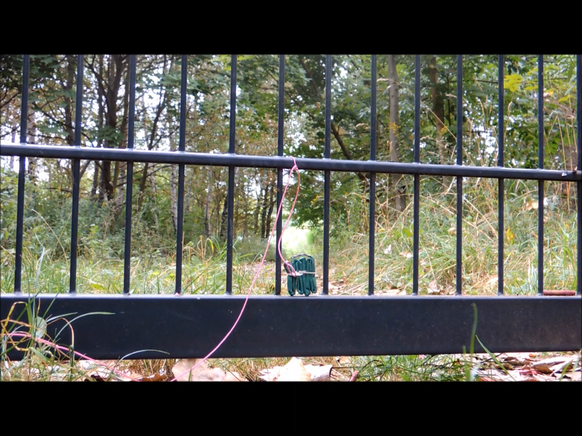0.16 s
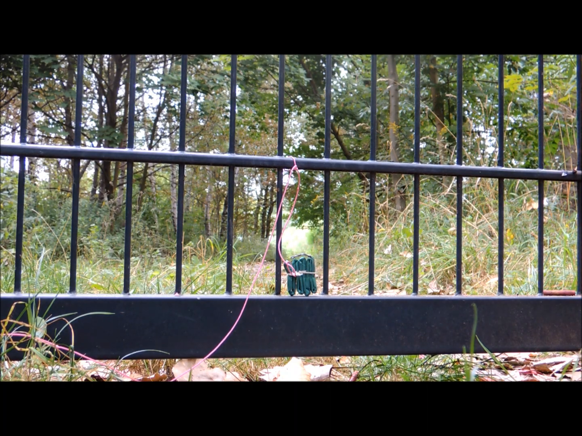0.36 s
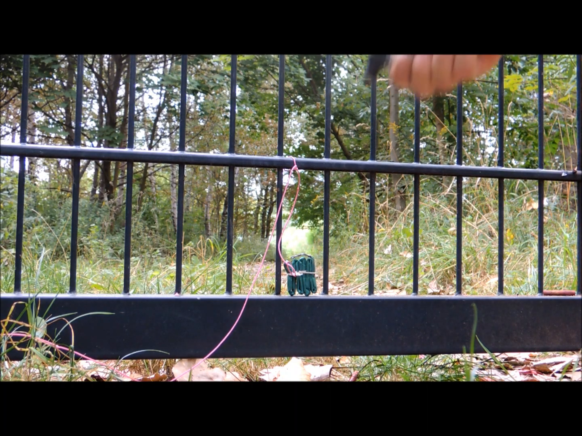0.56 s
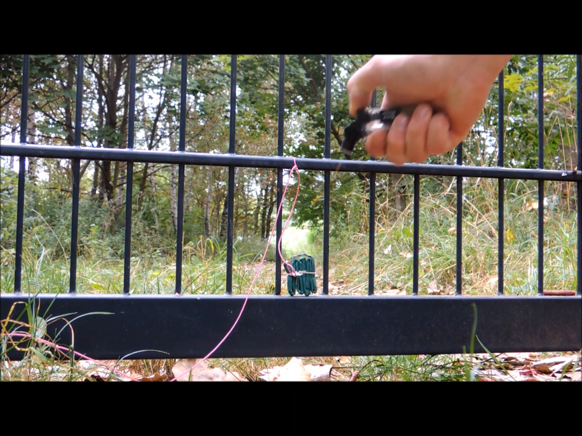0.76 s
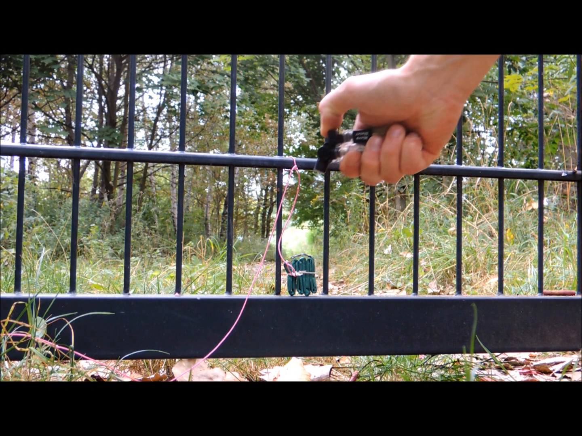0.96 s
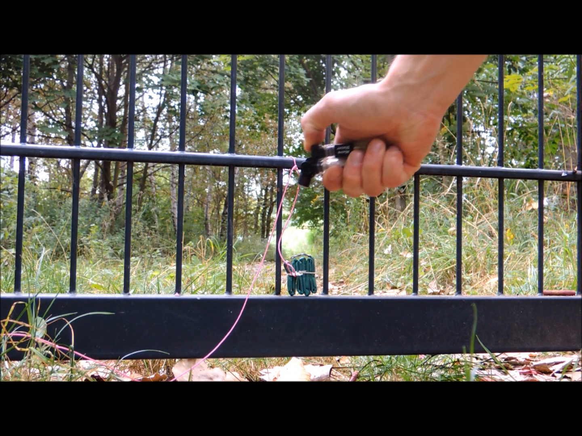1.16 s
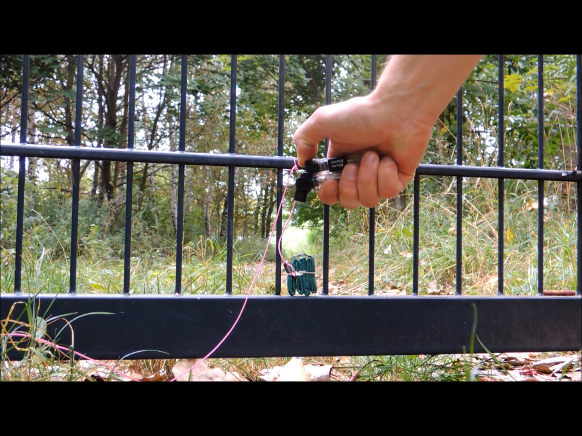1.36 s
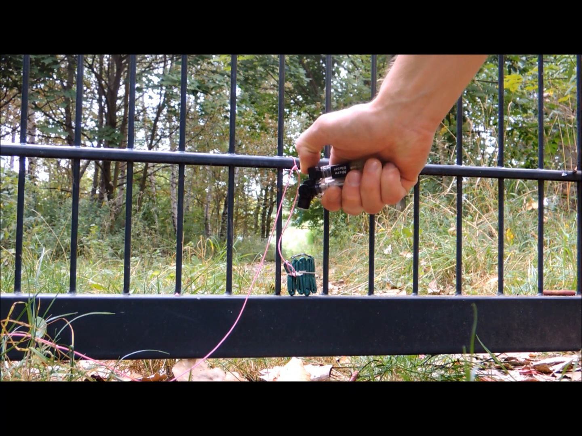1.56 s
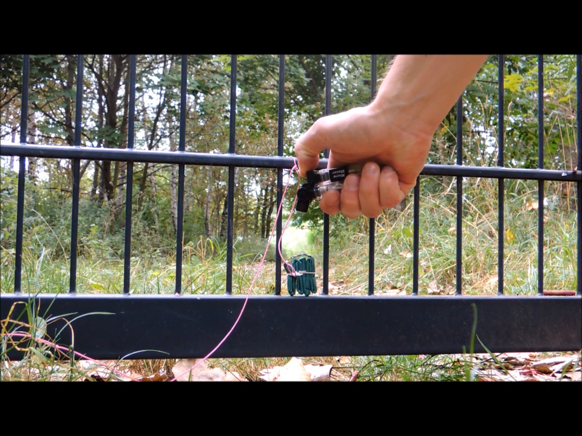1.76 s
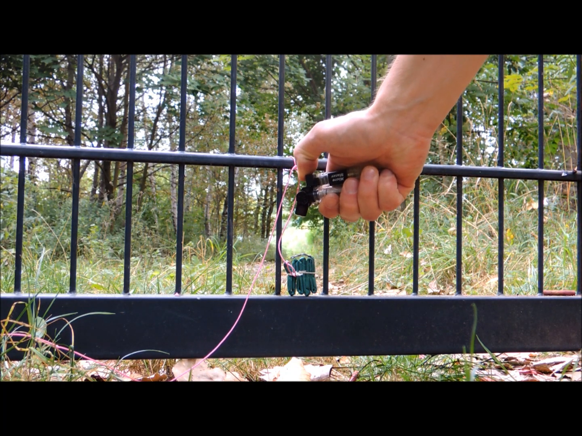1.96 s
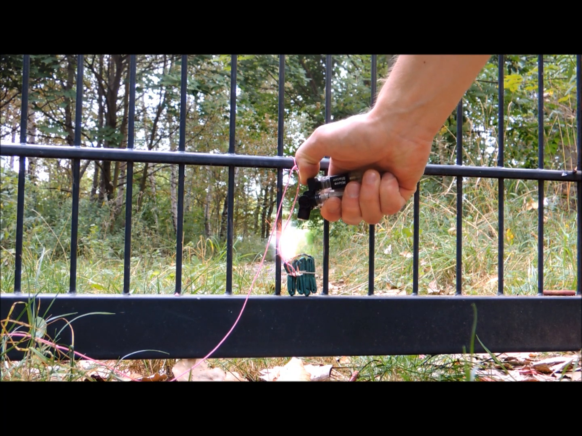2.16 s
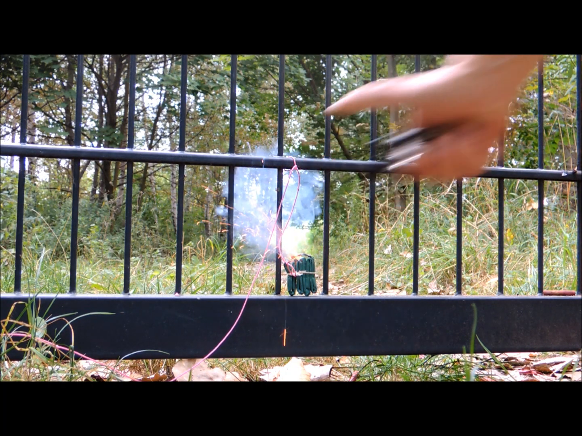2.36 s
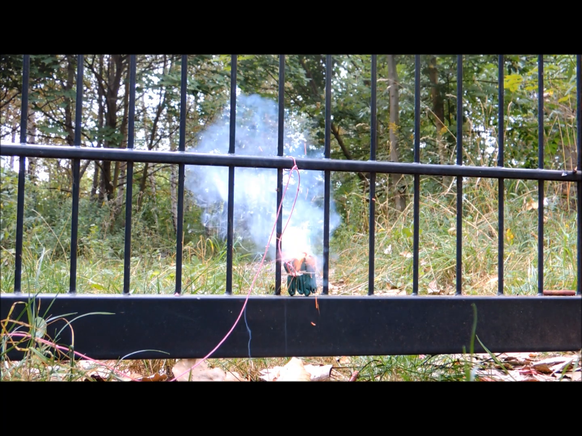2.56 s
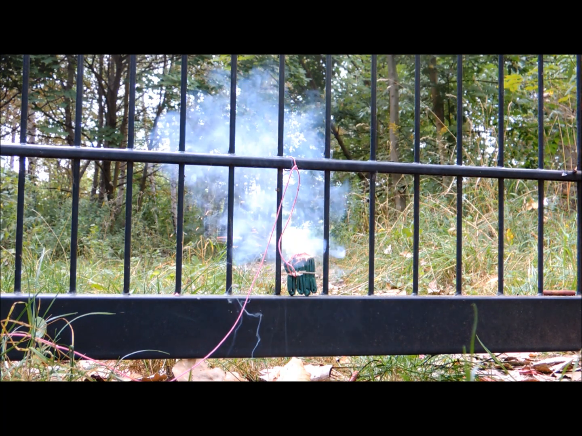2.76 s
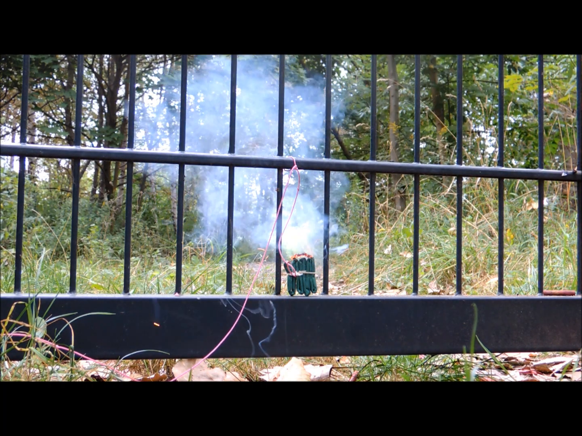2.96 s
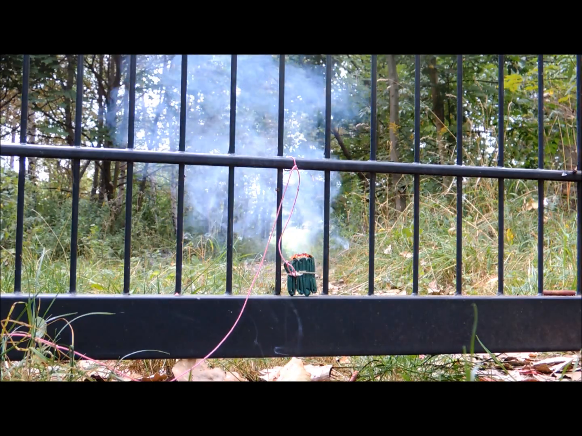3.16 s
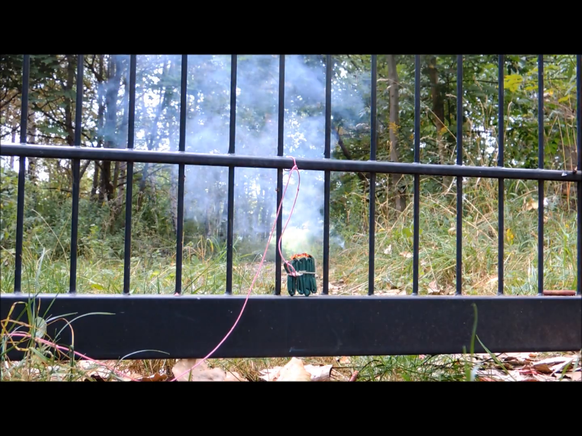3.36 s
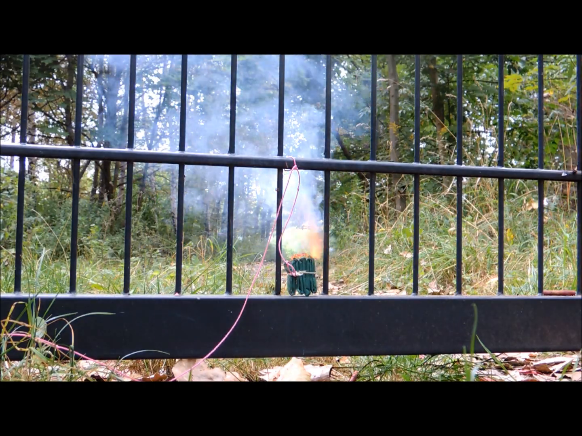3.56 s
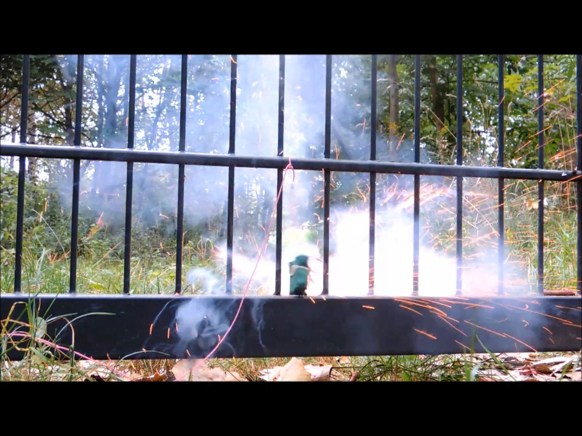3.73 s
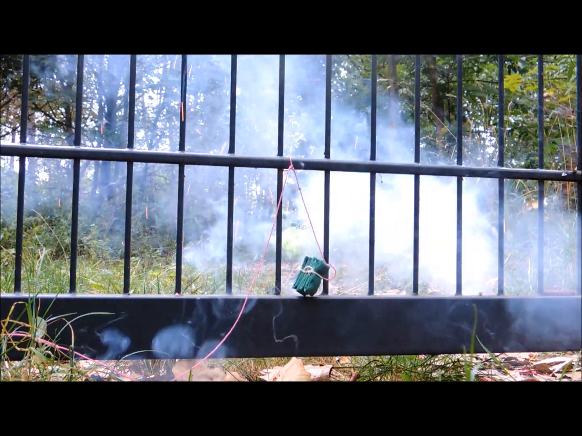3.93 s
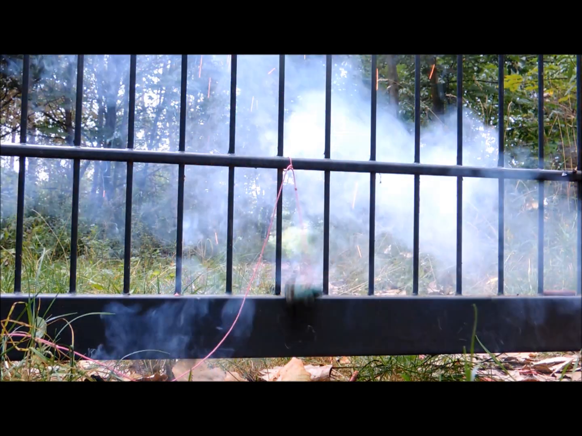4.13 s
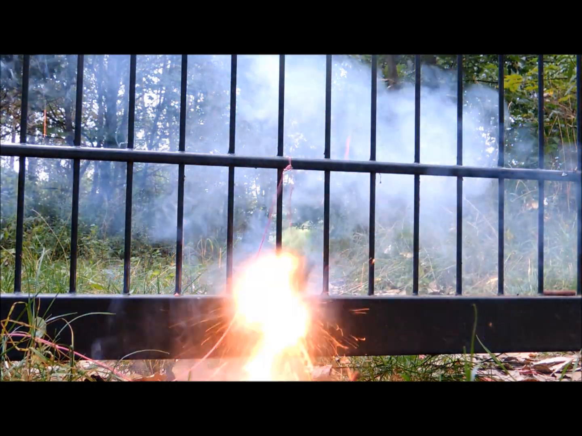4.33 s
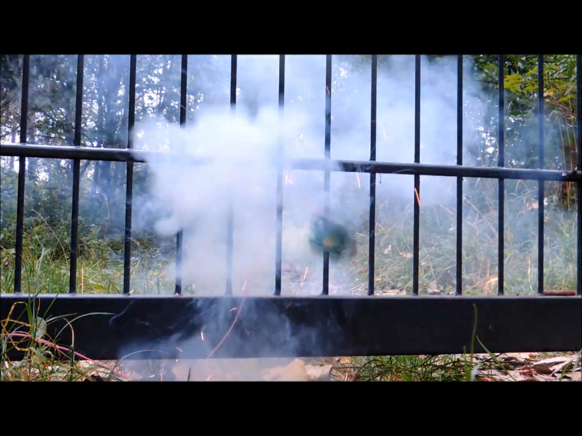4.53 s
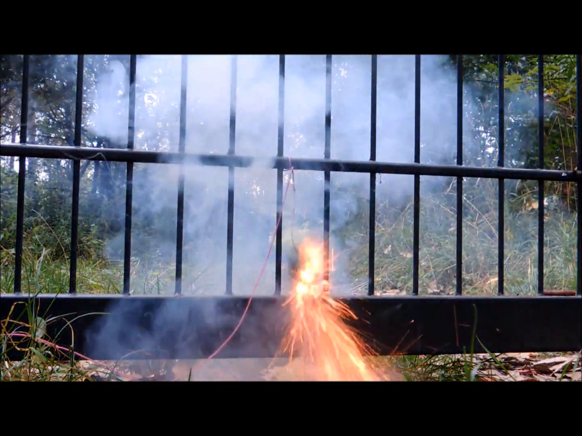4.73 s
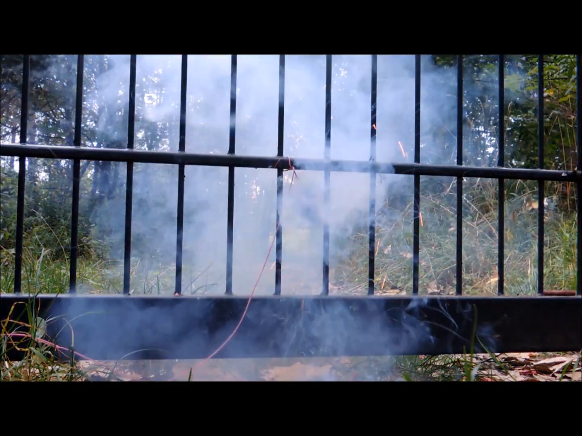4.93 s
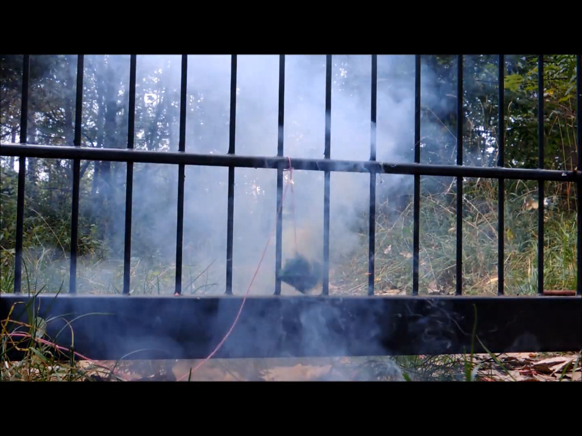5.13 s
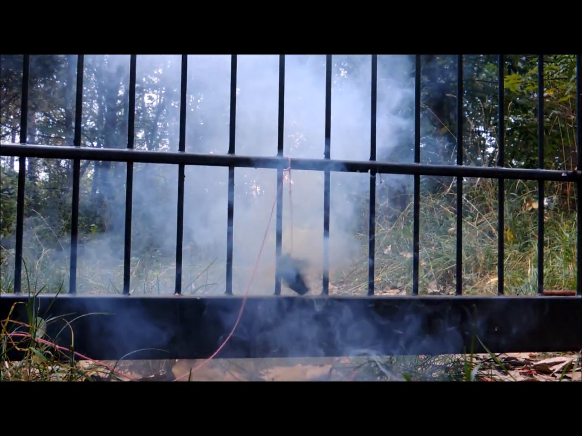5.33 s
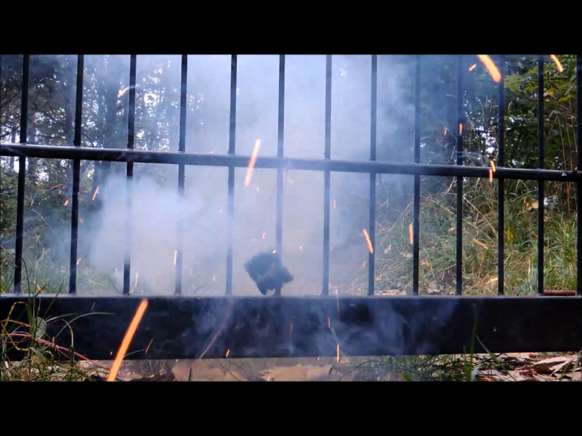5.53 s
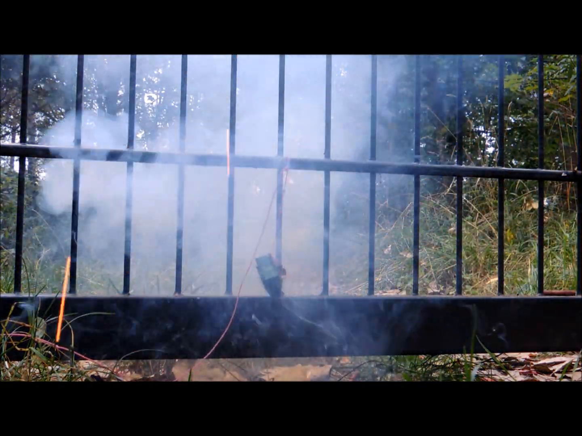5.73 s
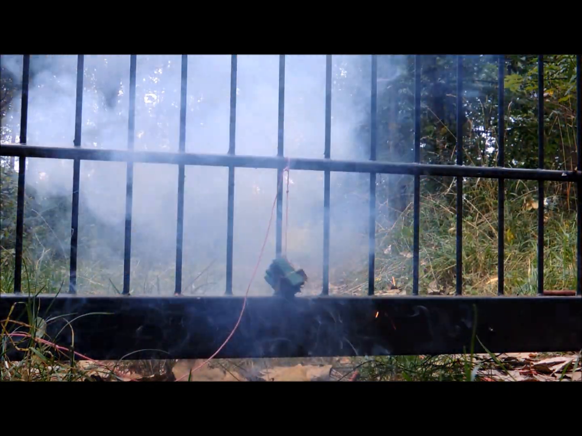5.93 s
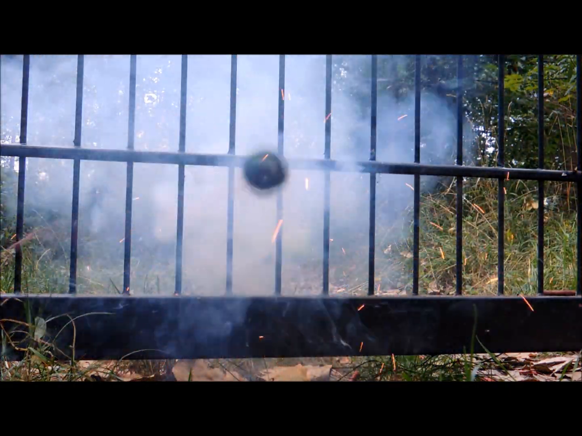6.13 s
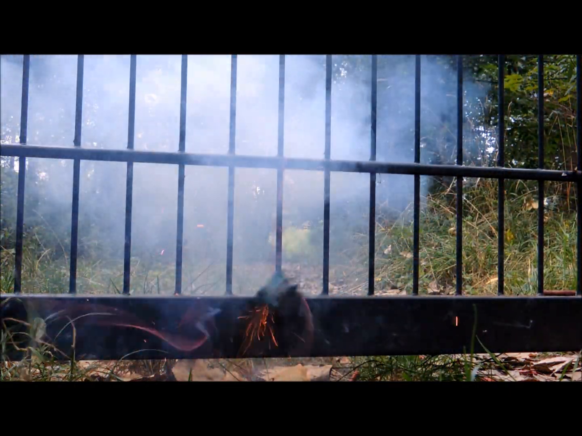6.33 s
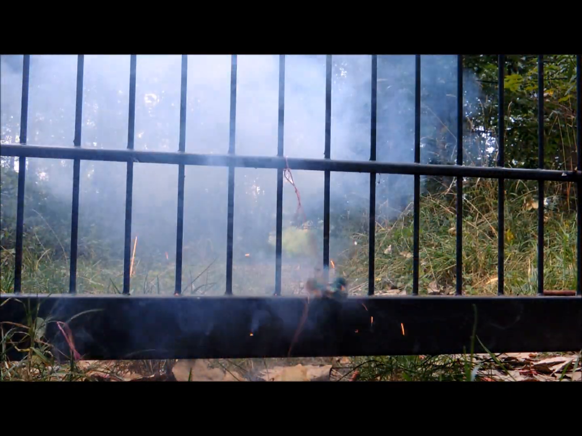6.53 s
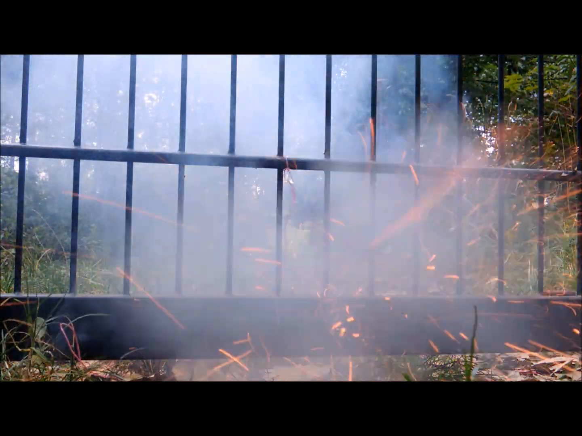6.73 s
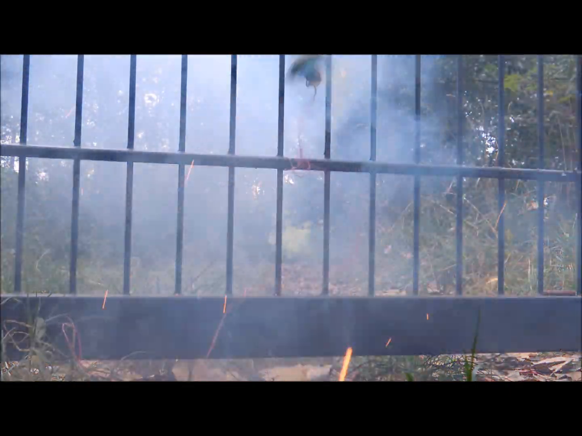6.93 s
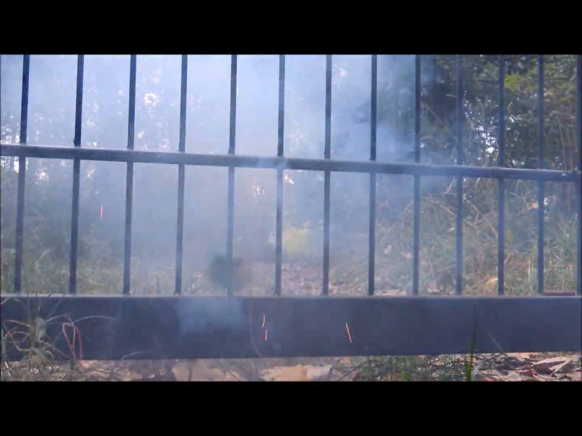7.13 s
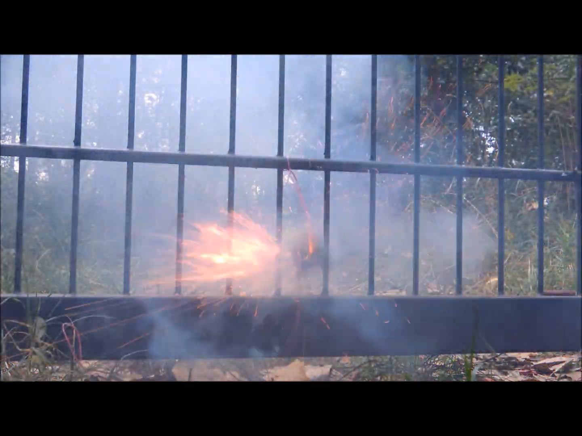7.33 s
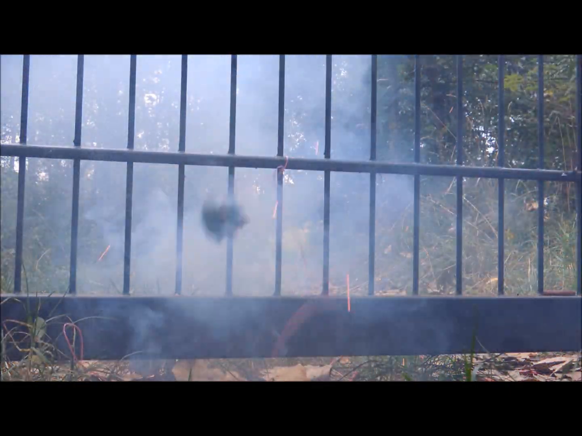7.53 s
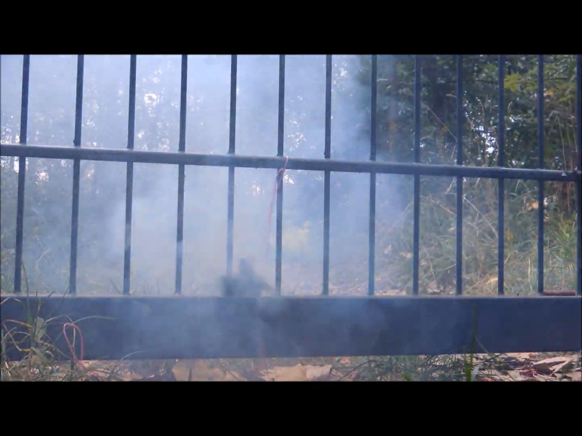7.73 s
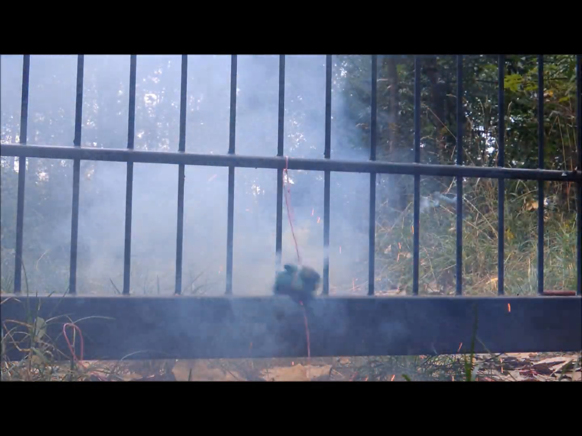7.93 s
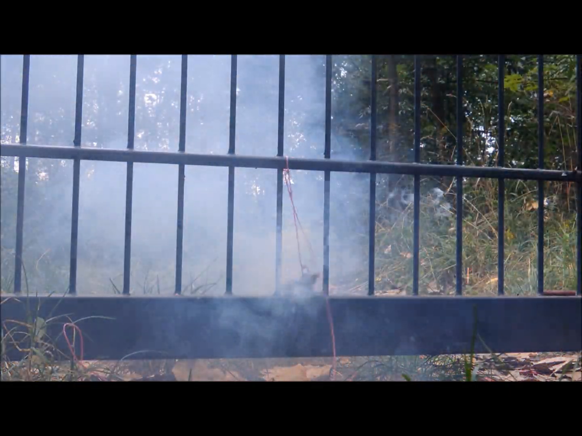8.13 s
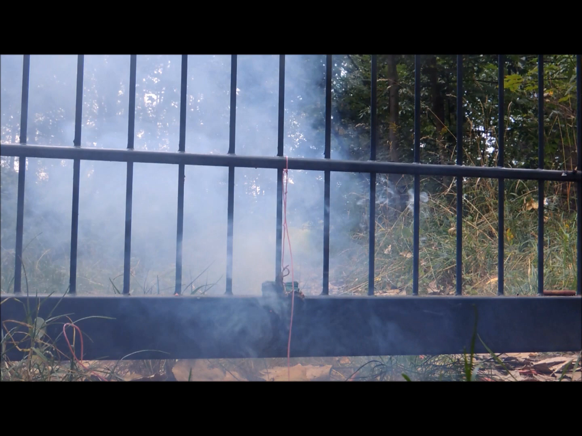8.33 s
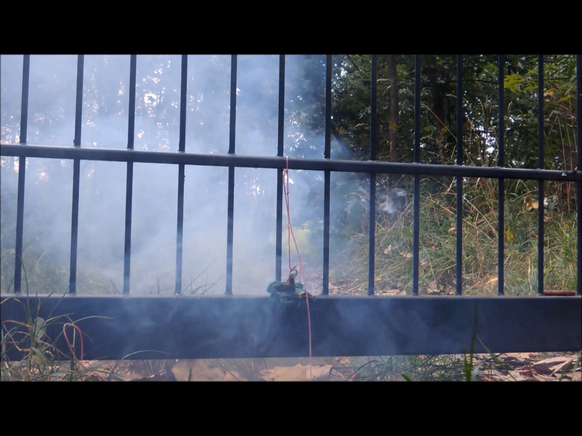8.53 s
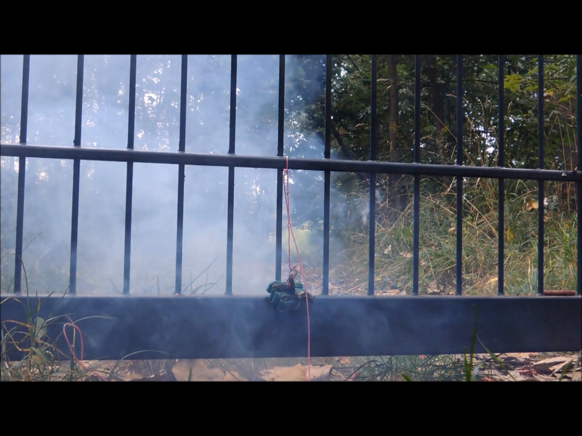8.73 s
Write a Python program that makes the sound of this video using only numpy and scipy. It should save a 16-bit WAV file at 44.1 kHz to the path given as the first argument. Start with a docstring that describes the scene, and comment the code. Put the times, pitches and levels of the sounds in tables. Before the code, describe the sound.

Soft outdoor air and low rumble open the scene. Around 0.35 s dull handling knocks and gas spits start a jet lighter; its thin, bright hiss runs steadily, with a hard igniter snap at 0.9 s and soft flame roars near 1.4, 1.8 and 2.25 s. The fuse catches about 2.35 s, fizzing and popping; the lighter cuts off near 2.45 s with a small snap. Spurts come at 3.2 s, then denser papery crackling and sharp ticks from 3.5 s. Bangs hit at 3.82 and 3.92 s, a tiny squeal between them, then at 4.57, 4.98, 5.63, 6.23, 6.96 (thuddier, with a clanking rail) and 7.55 s. Each is a violent crack overloading the close microphone, with bright tree scatter lasting about a third of a second, a dull distant tail and faint fence ring. Weak fuse hisses fill the gaps. A small snap at 8.03 s ends it, leaving faint hiss and slowly returning air.

```python
"""Firecracker string on a metal fence

A jet lighter hisses, clicks alight and lights a fuse, which sputters; then nine charges go off in turn.
Hiss and blasts are shaped noise; metal and pops are decaying modes; gas tones are narrow-band noise.
Each crack scatters back from the trees at a wood's edge, over soft air noise and rumble.
The string is close: the strongest blasts pin the microphone for a moment.
"""
import sys
import numpy as np
from scipy import signal
from scipy.fft import rfft, irfft, next_fast_len
from scipy.io import wavfile

SR = 44100
rng = np.random.default_rng(int(sys.argv[2]) if len(sys.argv) > 2 else 0)


def transcribe(signal):
    """Save signal, clipped to [-1, 1], as a 16-bit WAV file at the path in sys.argv[1]."""
    frames = np.atleast_2d(signal).T
    limited = np.clip(frames, -1, 1)
    pcm = np.round(limited * 32767).astype(np.int16)
    wavfile.write(sys.argv[1], SR, pcm)


N = 392049
TIME = np.arange(N) / SR

# charges: (time [s], crack [dB], rise [s], crack t60 [s], thud [dB], thud t60 [s],
#           near echo [dB], near echo t60 [s], far echo [dB], rail ring [dB])
CHARGES = [(3.822, 4.5, 0.0015, .115, -13, 0.056, -7, 0.35, -34, -20),
           (3.9218, 5.5, 0.00063, 0.053, -20, 0.17, -5, 0.31, -32.5, -25),
           (4.5681, 7.5, .0007, 0.0091, -13.5, 0.14, -3, 0.27, -29.5, -10),
           (4.9756, 3, 0.00064, 0.011, -18.5, 0.17, -10.5, 0.3, -36, -40),
           (5.6268, 4.5, 0.00069, 0.013, -9.5, 0.11, -13, 0.33, -37.5, -15.5),
           (6.2283, 2, 0.0009, 0.026, -30.5, 0.25, -11.5, 0.31, -35.5, -31.5),
           (6.958, 2.5, 0.003, 0.046, -3, 0.048, -18.5, 0.34, -42, 3),
           (7.5501, 3, 0.0007, 0.054, -30.5, 0.37, -7, 0.29, -31.5, -16.5),
           (8.033, -19.5, 0.0061, 0.053, -23, 0.03, -35.5, 0.38, -70, -48)]
# scatter from near leaves and trunks: (frequency [Hz], relative level [dB])
NEAR_TREES_SPECTRUM = [(100, -36.5), (600, -23), (1200, -9), (2000, -2), (3200, -0.5), (4600, 0), (6500, 1),
                       (8500, 2), (10500, 4.5), (13000, 2.5), (15000, -18.5)]
# spurting gas or powder: (frequency [Hz], relative level [dB])
SPURT_SPECTRUM = [(200, -3), (900, -4), (2000, 0.5), (4500, -1), (7000, 0), (10000, -0.5), (13000, 0),
                  (15000, -8.5)]
# left-right correlation of direct sound: (frequency [Hz], correlation [-1..1])
DIRECT_CORRELATION = [(60, 1), (300, 0.95), (1500, 0.93), (4000, 0.96), (8000, 0.33), (14000, 0.48)]
# left-right correlation of echoes: (frequency [Hz], correlation [-1..1])
ECHO_CORRELATION = [(100, 0.47), (3000, 1), (6500, 0.47), (10000, 0.15), (14000, .02)]


def from_db(db):
    """Decibels to amplitude gain."""
    return 10 ** (np.asarray(db) / 20)


def rms_one(x):
    """Scale to unit power."""
    return x / np.sqrt(np.mean(x ** 2) + 1e-20)


def at_hz(points, hz):
    """Interpolate a spectrum on a log-frequency axis."""
    point_hz, value = np.transpose(points)
    return np.interp(np.log(hz + 1), np.log(point_hz), value)


def ramp(start_s, length_s):
    """Rise linearly from 0 to 1 over the given time."""
    return np.clip((TIME - start_s) / length_s, 0, 1)


def drift(knots_per_s):
    """Random wandering between Gaussian knots of spread 1."""
    knots = rng.standard_normal(N // 8)
    return np.interp(TIME * knots_per_s, np.arange(len(knots)), knots)


def noise(spectrum, correlation, left_db=1.5, ripple_db=1.5, ripple_hz=220):
    """Steady stereo noise, rms 1, with random ripples across its spectrum; its treble leans left."""
    size = next_fast_len(N)
    hz = np.arange(size // 2 + 1) * SR / size
    mid, side = rfft(rng.standard_normal((2, size)))
    alike = np.clip(at_hz(correlation, hz), -1, 1)
    sign = np.array([[1], [-1]])
    pair = np.sqrt(1 + alike) * mid + sign * np.sqrt(1 - alike) * side
    lean_db = sign * left_db / 2 * np.clip((hz - 4000) / 4000, 0, 1)
    knots = rng.standard_normal(1024)
    ripple = ripple_db * np.interp(hz / ripple_hz, np.arange(len(knots)), knots)
    ripple *= np.minimum(hz / 2000, 1)
    gain = from_db(at_hz(spectrum, hz) + lean_db + ripple)
    return rms_one(irfft(pair * gain, size)[:, :N])


def bursts(rows):
    """Envelope of (time [s], peak [dB], rise [s], t60 [s]) bursts: swell, then decay; powers add."""
    power = np.zeros(N)
    for s, db, rise_s, t60_s in rows:
        span = slice(max(int((s - 5 * rise_s) * SR), 0), int((s + 2 * t60_s) * SR))
        age = TIME[span] - s
        decay = from_db(db - 60 * np.maximum(age, 0) / t60_s)
        swell = np.exp(np.minimum(age, 0) / rise_s)
        power[span] += (decay * swell) ** 2
    return np.sqrt(power)


def strike(hits, modes, spread_db):
    """Hits (time [s], level [dB]) ring modes (frequency [Hz], level [dB], t60 [s]) at random strengths."""
    s, db = np.transpose(hits)
    out = np.zeros(N)
    for hz, mode_db, t60_s in modes:
        clicks = np.full(N, 1e-18)  # tiny floor averts denormals
        strength_db = db + mode_db + spread_db * rng.standard_normal(len(s))
        clicks[(s * SR).astype(int)] = from_db(strength_db)
        r = np.exp(-np.log(1000) / (t60_s * SR))
        w = 2 * np.pi * hz / SR
        out += signal.lfilter([0, np.sin(w)], [1, -2 * r * np.cos(w), r * r], clicks)
    return out


def whistles(rows, settle_s, swell_s, fade_t60_s):
    """Narrow-band noise that swells, holds and fades while its centre pitch settles exponentially."""
    out = np.zeros(N)
    for s, length_s, start_hz, final_hz, width_hz, db in rows:
        age = TIME - s
        hz = final_hz + (start_hz - final_hz) * np.exp(-np.maximum(age, 0) / settle_s)
        fade_db = 60 * np.clip((age - length_s) / fade_t60_s, 0, 2)
        level = ramp(s - swell_s, swell_s) * from_db(db - fade_db)
        sos = signal.butter(1, width_hz / 2, fs=SR, output="sos")
        white = rng.standard_normal((2, N))
        a, b = signal.sosfilt(sos, signal.sosfilt(sos, white))
        phase = 2 * np.pi * np.cumsum(hz) / SR
        out += level * rms_one(a * np.cos(phase) + b * np.sin(phase))
    return out


def pops(per_s, level_db, low_hz, high_hz, count=12, cycles=6, spread_db=1.5):
    """Random pops at a given rate and level, each a short ring at one of several pitches."""
    born = np.flatnonzero(rng.random(N) < per_s / SR)
    hits = np.c_[born / SR, level_db[born]]
    pitch_index = rng.integers(0, count, len(born))
    out = np.zeros(N)
    for k, hz in enumerate(np.geomspace(low_hz, high_hz, count)):
        out += strike(hits[pitch_index == k], [(hz, 0, cycles / hz)], spread_db)
    return out


def outdoors(air_db=-42, rumble_db=-37.5, sink_db=20, hold_s=0.38, recover_db_per_s=19.5, rumble_share=0.58):
    """Air noise over low rumble; both sink at each bang, stay down a moment and creep back."""
    # soft air noise: (frequency [Hz], relative level [dB])
    air_spectrum = [(88, -35), (150, 2), (192, -3), (237, -2), (366, -5), (1210, -8), (5740, -22),
                    (10700, -23), (14000, -24.5)]
    # low rumble: (frequency [Hz], relative level [dB])
    rumble_spectrum = [(12, -39.5), (20, -7), (38, 5.5), (53, 7.5), (220, -20), (290, -60), (480, -120)]
    sunk_db = np.zeros(N)
    for s, *_ in CHARGES:
        recovered_db = recover_db_per_s * np.maximum(TIME - s - hold_s, 0)
        sunk_db = np.maximum(sunk_db, (TIME > s) * (sink_db - recovered_db))
    air = from_db(air_db - sunk_db) * noise(air_spectrum, DIRECT_CORRELATION)
    rumble_gain = from_db(rumble_db - rumble_share * sunk_db)
    return air + rumble_gain * noise(rumble_spectrum, DIRECT_CORRELATION)


def knocks():
    """Dull knocks of handling and of the fuse ring short, damped modes."""
    # knocks: (time [s], level [dB])
    knock_hits = [(.3633, -23), (.3815, -27), (.3843, -20.5), (.3868, -19.5), (3.16, -31), (3.238, -30.5),
                  (3.548, -30), (3.704, -31), (3.619, -23.5)]
    # damped resonances: (frequency [Hz], level [dB], t60 [s])
    knock_modes = [(810, -3, 0.034), (1076, 7.5, 0.011), (1560, -15, 0.013)]
    return strike(knock_hits, knock_modes, spread_db=1)


def lighter(on_s=0.31, off_s=2.46, open_s=0.09, close_s=0.041, jet_db=-45.5):
    """Gas spits, then rushes steadily from the nozzle with resonances and soft roars, gated by a valve."""
    # steady jet hiss, before and after lighting: (frequency [Hz], relative level [dB])
    jet_spectrum = [(300, 10.5), (1500, -11.5), (4200, 3.5), (5600, -14.5), (6400, -18), (7000, 5),
                    (7700, -2), (9500, -0.5), (11000, 4), (12500, 8), (15000, 2.5)]
    # roaring flame: (frequency [Hz], relative level [dB])
    flame_spectrum = [(150, 5), (500, -7), (1050, -2), (2000, -7.5), (3200, -12), (6000, -44), (14000, -35)]
    # spits while the trigger is pressed: (time [s], level [dB], rise [s], t60 [s])
    spit_rows = [(.345, -37.5, .006, 0.48), (.43, -33.5, .003, 0.11), (.455, -33.5, 0.0073, 0.13),
                 (.6, -41, 0.16, .6)]
    # roars as the jet opens and as its flame meets the fuse: (time [s], level [dB], rise [s], t60 [s])
    roar_rows = [(.44, -39.5, 0.059, 1.3), (1.35, -47.5, 0.1, 1.9), (1.77, -37, 0.099, 0.76),
                 (2.25, -40.5, 0.056, .5)]
    # jet resonances, climbing as the nozzle heats:
    # (time [s], length [s], start [Hz], final [Hz], width [Hz], level [dB])
    jet_tones = [(.5, 0.23, 5160, 5280, 950, -45), (.52, 0.17, 9250, 9560, 1006, -48.5),
                 (.52, .2, 12950, 13340, 1006, -62), (.8, 0.09, 7900, 9500, 1400, -47),
                 (.92, .75, 11000, 13460, 1900, -47.5), (1.38, 1.3, 10700, 11980, 1900, -48.5)]
    valve = ramp(on_s, open_s) - ramp(off_s - close_s, close_s)
    hiss = from_db(jet_db) * noise(jet_spectrum, DIRECT_CORRELATION)
    roar = bursts(roar_rows) * noise(flame_spectrum, DIRECT_CORRELATION)
    tones = whistles(jet_tones, settle_s=0.31, swell_s=0.03, fade_t60_s=0.7)
    spits = bursts(spit_rows) * noise(SPURT_SPECTRUM, DIRECT_CORRELATION)
    return valve * (hiss + roar + tones) + spits


def snaps(echo_db=-31, echo_t60_s=0.14):
    """Sharp noise snaps of igniter, sparks and the last casing, each with a faint scatter."""
    # snaps: (time [s], level [dB], t60 [s])
    snap_rows = [(0.8935, 4.5, 0.014), (1.164, -34, 0.026), (2.5277, -9, 0.008), (3.304, -33, 0.011),
                 (3.392, -32, 0.01), (3.447, -45, .01), (3.505, -27, 0.0088), (3.625, -5, 0.0045),
                 (3.732, -31.5, .012), (5.378, -43.5, 0.033), (5.897, -46, 0.06), (8.0354, -6, 0.021)]
    # snap colour: (frequency [Hz], relative level [dB])
    snap_spectrum = [(150, 5), (800, -17), (1400, 1), (2000, 2), (2600, -3), (3200, 9), (3900, -3),
                     (4700, 5.5), (5700, 1.5), (8500, 3.5), (10000, 0), (13000, 12.5), (15000, -20)]
    direct = bursts([(s, db, 0.0002, t60_s) for s, db, t60_s in snap_rows])
    echo = bursts([(s, db + echo_db, 0.001, echo_t60_s) for s, db, _ in snap_rows])
    scatter = echo * noise(NEAR_TREES_SPECTRUM, ECHO_CORRELATION)
    return direct * noise(snap_spectrum, DIRECT_CORRELATION) + scatter


def crackle(vigour, pops_per_s=55, pop_db=-34, rate_exponent=0.55, level_exponent=0.71):
    """Powder pops faster and louder with vigour (1 = steady burn); the paper wrapping crackles lower."""
    # burning paper: (time [s], length [s], rate [pops/s], level [dB])
    wrapping = (3.5, 0.305, 150, -26)
    level_db = pop_db + level_exponent * 20 * np.log10(vigour + 1e-9)
    powder = pops(pops_per_s * vigour ** rate_exponent, level_db, low_hz=700, high_hz=6000)
    s, length_s, per_s, db = wrapping
    burning = (TIME > s) * (TIME < s + length_s)
    paper = pops(per_s * burning, np.full(N, db), low_hz=800, high_hz=2600)
    return powder + paper


def fuse(lit_s=2.34, catch_s=0.067, burn_db=-44, smoulder_db=-58, smoulder_t60_s=35,
         flutter_db=1.8, grain_db=2.0):
    """Powder hisses, flares, spurts and whistles; it pops in the open, then smoulders in the bundle."""
    # fuse hiss: (frequency [Hz], relative level [dB])
    fuse_spectrum = [(300, -17.5), (1200, -9), (3000, -3.5), (6000, 1), (8000, 2.5), (10500, 8), (12500, 5),
                     (15000, -3)]
    # longer, bright hisses: (time [s], level [dB], rise [s], t60 [s])
    flare_rows = [(2.62, -31, .12, 1.1), (3.18, -34.5, 0.17, 0.93), (3.597, -21, 0.0098, .28),
                  (3.81, -31, 0.024, .3), (4.3, -46.5, 0.3, 3.1), (4.54, -44.5, .1, .4),
                  (5.37, -50, .02, 0.17), (6.12, -62.5, 0.085, 0.65), (6.51, -41, 0.032, 2.9),
                  (6.91, -53.5, 0.07, 1.3), (8.66, -56.5, .04, 0.77)]
    # short spurts of burning powder: (time [s], level [dB], rise [s], t60 [s])
    spurt_rows = [(3.208, -19.5, 0.0015, .06), (3.238, -27.5, 0.0042, 0.1), (3.268, -21, 0.0028, 0.037),
                  (3.568, -26, 0.00055, 0.037), (3.622, -20, 0.0091, .1), (3.652, -26, 0.0033, 0.18),
                  (3.89, -14.5, 0.024, 0.014), (7.255, -41.5, 0.0027, 0.14), (7.287, -42, 0.0062, 0.15)]
    # escaping gas: (time [s], length [s], start [Hz], final [Hz], width [Hz], level [dB])
    gas_tones = [(2.6, 0.088, 2900, 3293, 2200, -39), (4.33, 0.23, 12300, 11600, 1706, -62),
                 (6.52, 0.092, 11640, 10200, 2200, -38.5), (6.85, 0.11, 10200, 9700, 1500, -47.5),
                 (8.04, 0.017, 8340, 8200, 700, -49.5), (8.03, .01, 5700, 5520, 1600, -52)]
    # rising squeal between the first two charges:
    # (time [s], length [s], start [Hz], final [Hz], width [Hz], level [dB])
    squeal_rows = [(3.883, 0.013, 4100, 4670, 800, -15)]
    first_s, last_s = CHARGES[0][0], CHARGES[-1][0]
    in_open = ramp(lit_s, catch_s) * (TIME < first_s)
    in_bundle = (TIME >= first_s) * (TIME < last_s)
    smoulder = in_bundle * from_db(smoulder_db - 60 * (TIME - first_s) / smoulder_t60_s)
    level = np.hypot(from_db(burn_db) * in_open + smoulder, bursts(flare_rows))
    burn = level * noise(fuse_spectrum, DIRECT_CORRELATION)
    spurts = bursts(spurt_rows) * noise(SPURT_SPECTRUM, DIRECT_CORRELATION)
    tones = whistles(gas_tones, settle_s=0.43, swell_s=0.055, fade_t60_s=0.62)
    squeal = whistles(squeal_rows, settle_s=0.0011, swell_s=0.0043, fade_t60_s=0.008)
    grain = rms_one(from_db(flutter_db * drift(90) + grain_db * drift(2500)))
    popping = crackle(in_open * level / from_db(burn_db))
    return grain * (burn + spurts + tones + squeal) + popping


def fence(level_db=4, waver_db=1.5, detune=0.012, bar_count=4):
    """Slightly unlike bars ring after each charge, in step with its near echo, wavering as they sway."""
    # faint fence ring: (frequency [Hz], level [dB], t60 [s])
    fence_modes = [(484, -69.5, 2.9), (1160, -65, 2.1), (1330, -63.5, 1.8), (1690, -62, 1.9),
                   (1880, -59.5, 1.5), (2040, -57, 1.9), (2160, -56, 1.3), (2401, -54, 1.3),
                   (2562, -58, 1.0), (2870, -52.5, 1.3), (3250, -53, 1.1), (3560, -53, 0.99)]
    s, near_echo_db = np.transpose(CHARGES)[[0, 6]]
    hits = np.c_[s, near_echo_db + level_db]
    out = np.zeros(N)
    for hz, db, t60_s in fence_modes:
        offsets = rng.uniform(-1, 1, bar_count)
        bars = [(hz * (1 + detune * offset), db, t60_s) for offset in offsets]
        out += strike(hits, bars, spread_db=4) * from_db(waver_db * drift(5.9))
    return out


def blast_pressure(leak_hz=2.1, skew=0.51):
    """Hot gas shoves each diaphragm; the pressure leaks through a vent and swings slowly back."""
    # pressure before the leak, 1 = full scale: (time [s], length [s], left [1], right [1])
    blast_rows = [(3.8285, 0.0044, 0.55, .9), (3.9233, 0.003, -0.79, 4.5), (4.567, 0.018, -2.2, -3),
                  (4.975, 0.023, -2, -2.2), (5.627, 0.019, -2.2, -1.72), (6.2297, 0.02, -1.82, -2),
                  (6.956, 0.0069, -1.5, -1.5), (6.9617, 0.0052, 2, 1.5), (6.965, 0.014, 0.061, 0.3),
                  (7.551, 0.0199, -1.66, -0.5)]
    push = np.zeros((2, N))
    for s, length_s, left, right in blast_rows:
        progress = ramp(s, length_s)
        pulse = np.abs(np.sin(np.pi * progress ** skew))  # skew < 1: early peak
        push += np.outer([left, right], pulse)
    return signal.sosfilt(signal.butter(2, leak_hz, "high", fs=SR, output="sos"), push)


def bangs(swell_db=-27, swell_rise_s=0.0064, near_delay_s=0.01, near_rise_s=0.0063,
          far_delay_s=0.075, far_rise_s=0.012, far_t60_s=0.88, grain_db=0.5, patchy_db=1.5):
    """Each charge cracks and thuds after a faint swell, scatters from near and deep wood, rings the rail."""
    # crack: (frequency [Hz], relative level [dB])
    crack_spectrum = [(100, -2.5), (400, 4.5), (1200, 0.5), (2000, -3), (4000, 2.5), (7000, 0), (10000, 6),
                      (13000, 1), (15000, -9)]
    # thud: (frequency [Hz], relative level [dB])
    thud_spectrum = [(30, 5), (70, 7), (150, -6.5), (400, -1.5), (800, -7.5), (1500, -14.5), (4000, -24)]
    # duller scatter from deep in the wood: (frequency [Hz], relative level [dB])
    far_spectrum = [(100, -13.5), (400, -5.5), (1000, -7), (1500, -4.5), (2200, 2.5), (3400, 2.5),
                    (5000, -0.5), (8000, -0.5), (14000, -11)]
    # left-right correlation of crack and thud: (frequency [Hz], correlation [-1..1])
    crack_correlation = [(100, 0.81), (500, 0.88), (1500, 0.88), (4000, 0.94), (8000, 0.8), (14000, 1)]
    # hollow base rail of the fence: (frequency [Hz], level [dB], t60 [s])
    rail_modes = [(454.5, -10, 0.034), (468, -64, 2.8), (737, 1, 0.035), (830, -9, 0.024),
                  (926, -66.5, 2.3), (1210, -10.5, 0.033), (1465, -0.5, 0.018)]
    (s, crack_db, rise_s, crack_t60_s, thud_db, thud_t60_s,
     near_db, near_t60_s, far_db, ring_db) = np.transpose(CHARGES)
    each = np.ones(len(s))
    # a faint noise swells for milliseconds before the crack
    swell = bursts(zip(s, crack_db + swell_db, swell_rise_s * each, crack_t60_s))
    burst = bursts(zip(s, crack_db, rise_s, crack_t60_s))
    crack = (swell + burst) * noise(crack_spectrum, crack_correlation)
    thud_level = bursts(zip(s + 0.0014, thud_db, rise_s, thud_t60_s))
    thud = thud_level * noise(thud_spectrum, crack_correlation)
    near_level = bursts(zip(s + near_delay_s, near_db, near_rise_s * each, near_t60_s))
    near = near_level * noise(NEAR_TREES_SPECTRUM, ECHO_CORRELATION, left_db=2.5)
    far_level = bursts(zip(s + far_delay_s, far_db, far_rise_s * each, far_t60_s * each))
    far = far_level * noise(far_spectrum, ECHO_CORRELATION)
    # single trunks throw back stronger echoes than the foliage between them
    trunks = rms_one(from_db(grain_db * drift(2000) + patchy_db * drift(130)))
    rail = strike(np.c_[s, ring_db], rail_modes, spread_db=1)
    return crack + thud + trunks * (near + far) + rail


def scene():
    """Lighter, fuse and charges in the open air."""
    handling = outdoors() + knocks() + lighter() + snaps()
    return handling + fuse() + fence() + blast_pressure() + bangs()


def record(dry, top=0.9, cutoff_hz=14300):
    """The microphone overloads, choking sound while a blast pins it; the treble is cut steeply."""
    pinned = dry / (1 + (dry / top) ** 4) ** (1 / 4)
    lowpass = signal.ellip(10, 0.1, 70, cutoff_hz, fs=SR, output="sos")
    return signal.sosfilt(lowpass, pinned)


dry = scene()
out = record(dry)
transcribe(out)
```